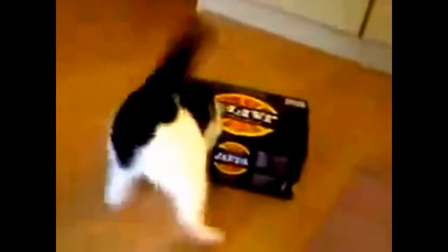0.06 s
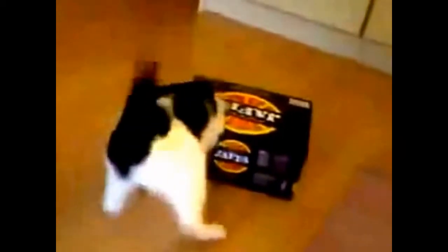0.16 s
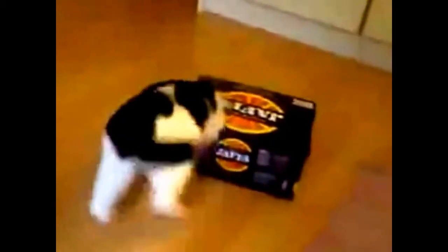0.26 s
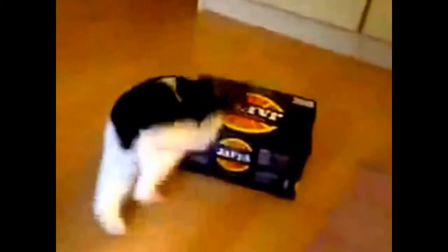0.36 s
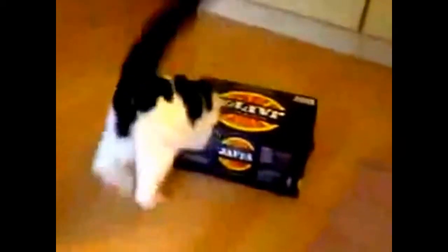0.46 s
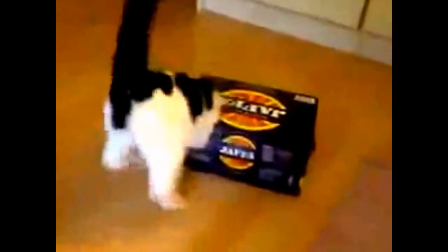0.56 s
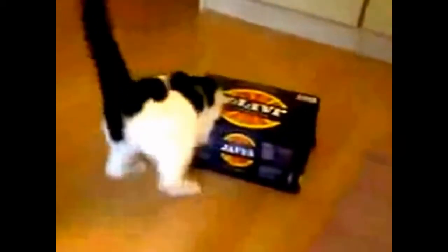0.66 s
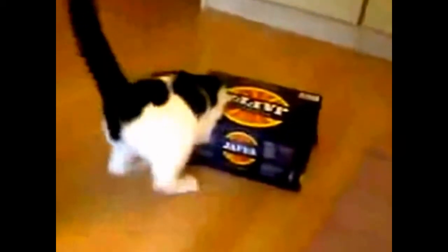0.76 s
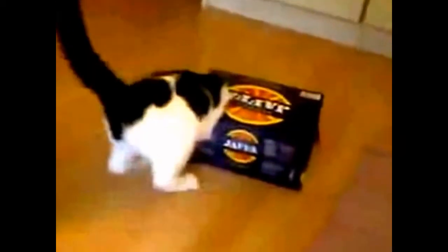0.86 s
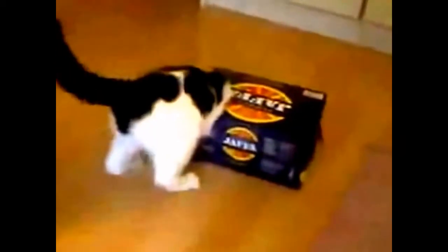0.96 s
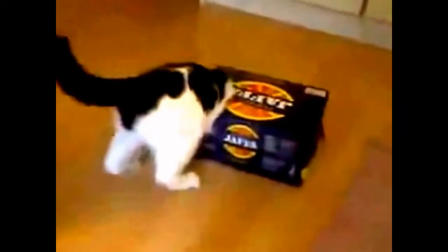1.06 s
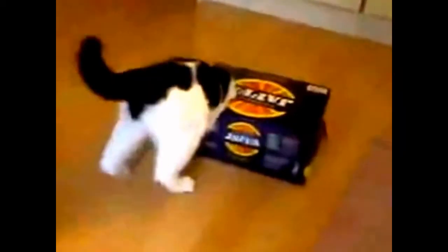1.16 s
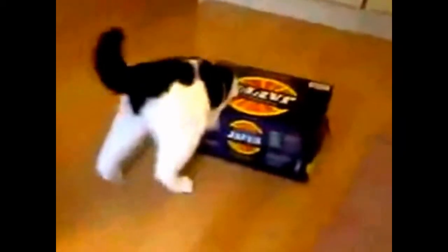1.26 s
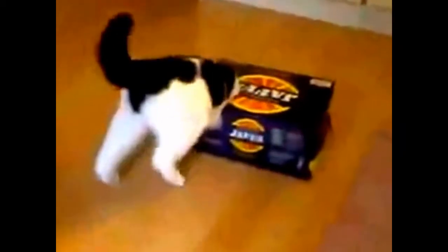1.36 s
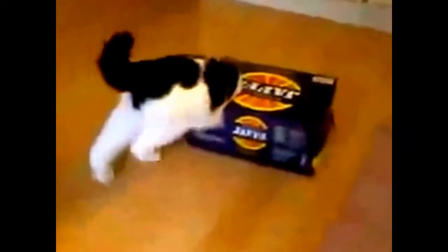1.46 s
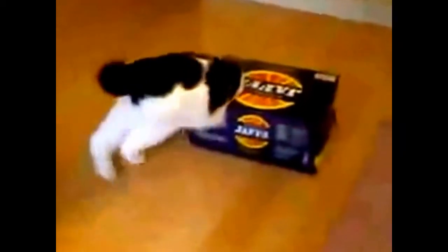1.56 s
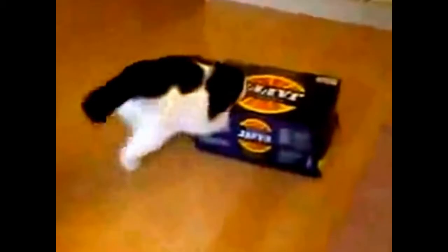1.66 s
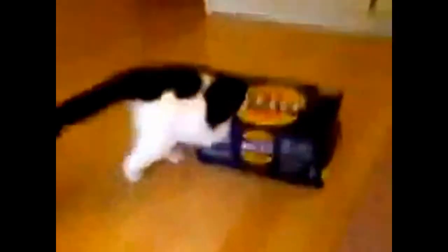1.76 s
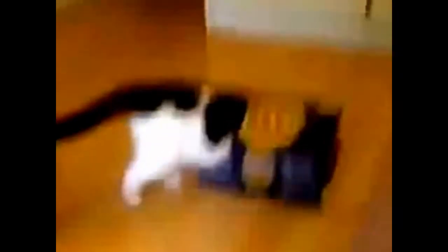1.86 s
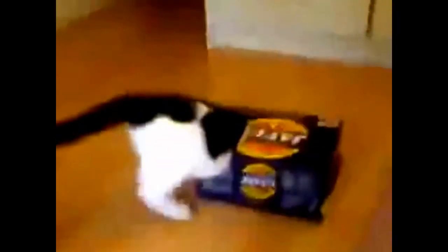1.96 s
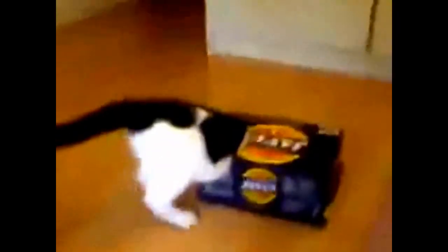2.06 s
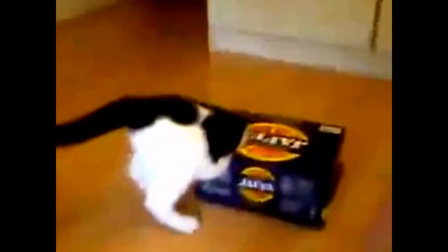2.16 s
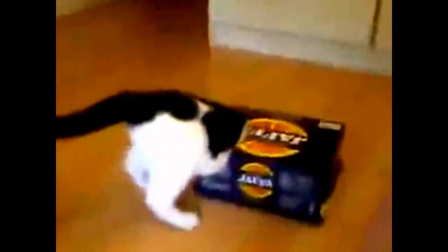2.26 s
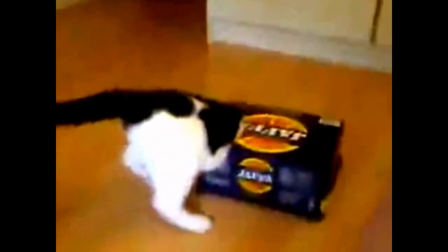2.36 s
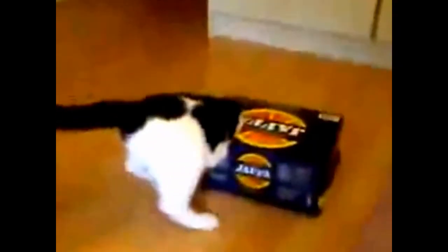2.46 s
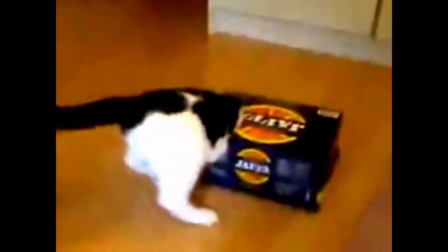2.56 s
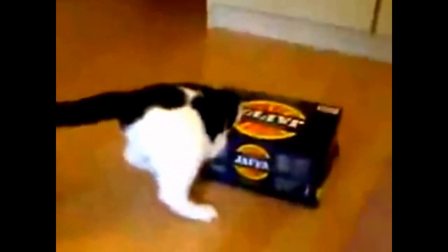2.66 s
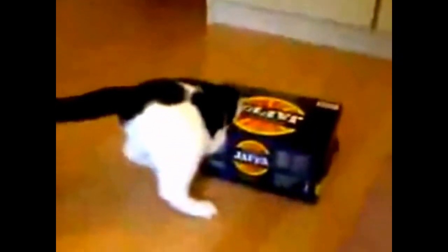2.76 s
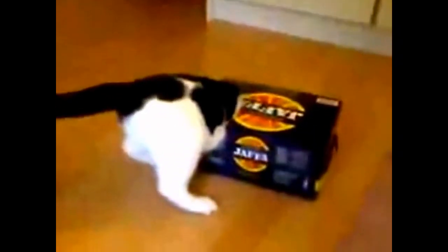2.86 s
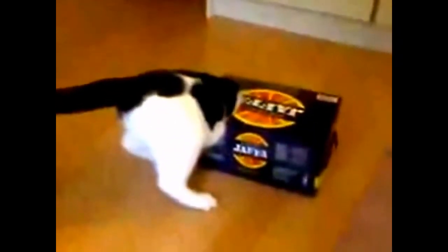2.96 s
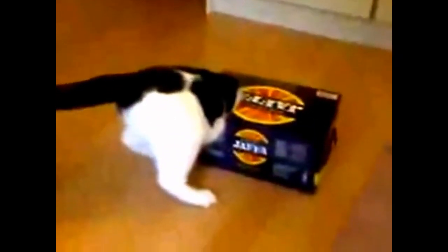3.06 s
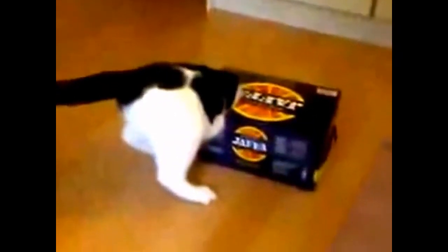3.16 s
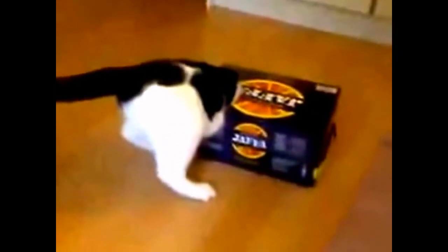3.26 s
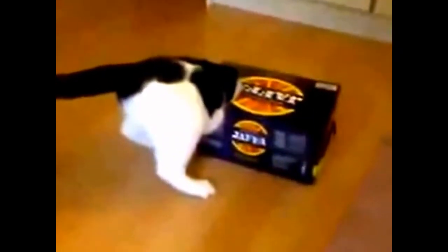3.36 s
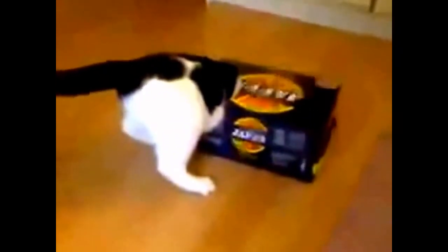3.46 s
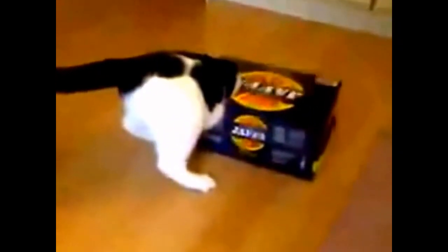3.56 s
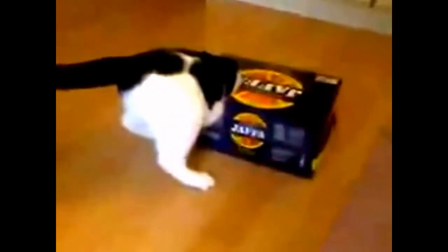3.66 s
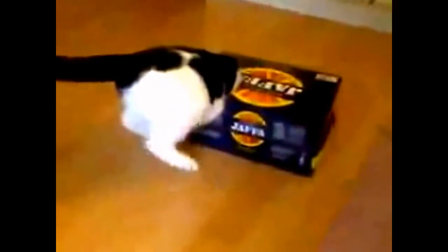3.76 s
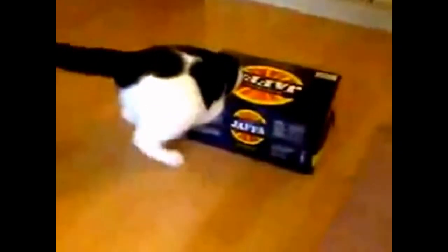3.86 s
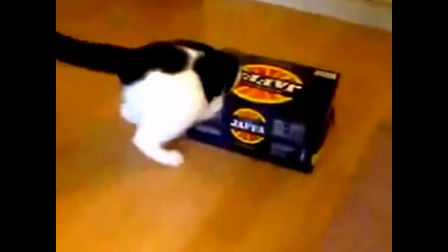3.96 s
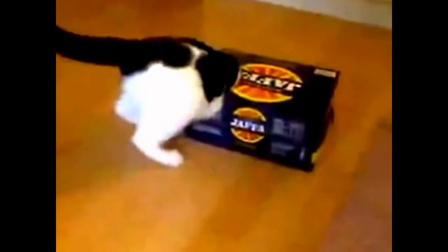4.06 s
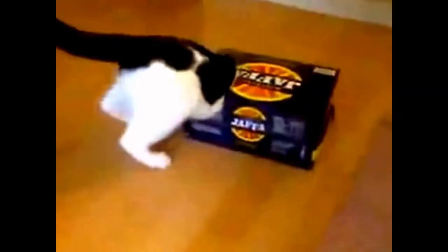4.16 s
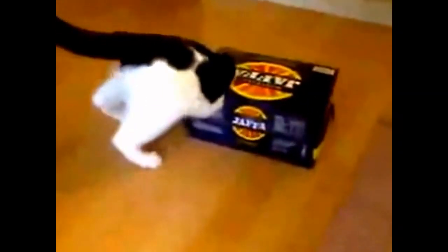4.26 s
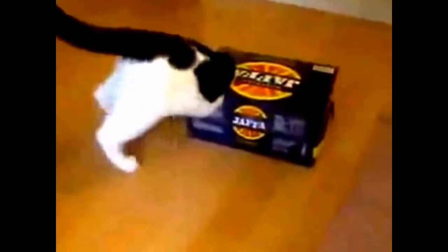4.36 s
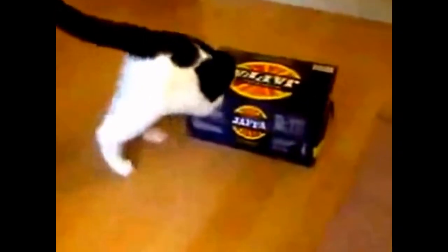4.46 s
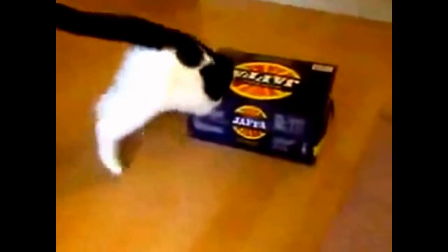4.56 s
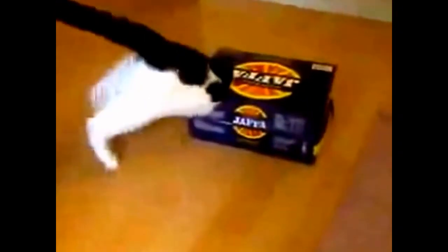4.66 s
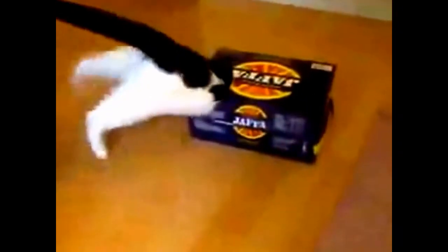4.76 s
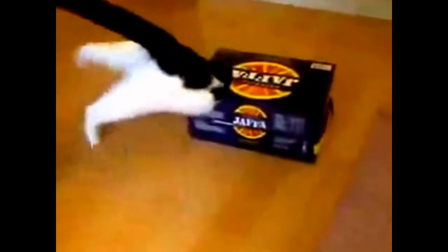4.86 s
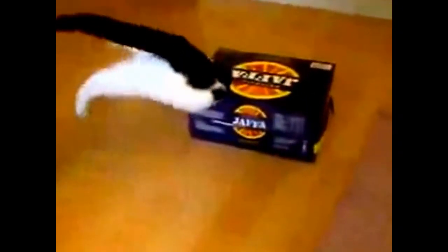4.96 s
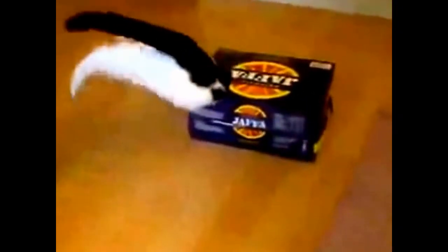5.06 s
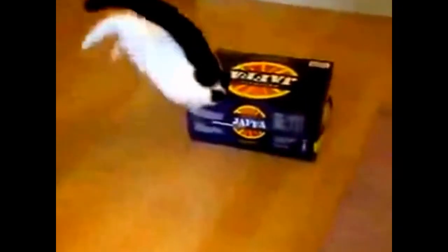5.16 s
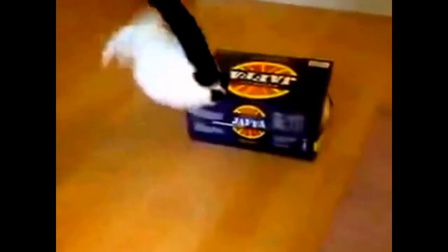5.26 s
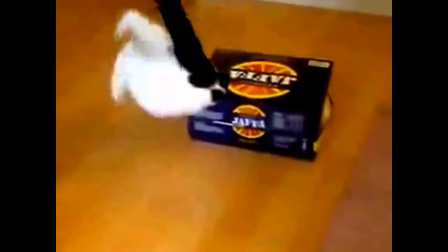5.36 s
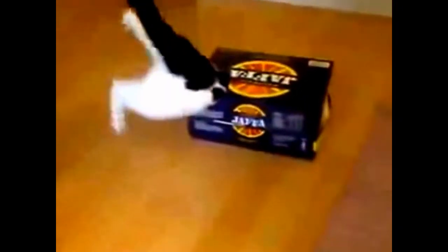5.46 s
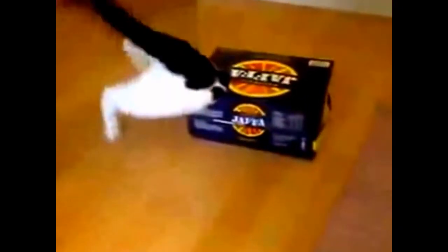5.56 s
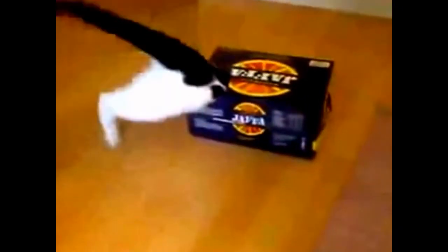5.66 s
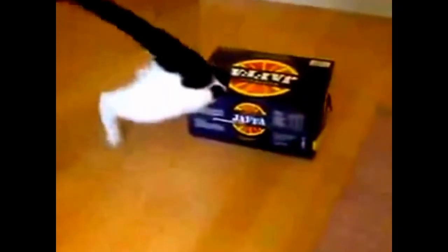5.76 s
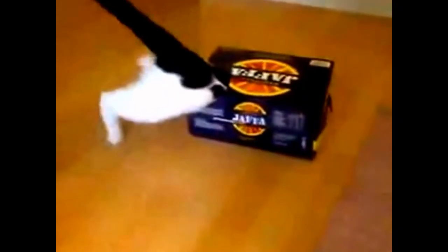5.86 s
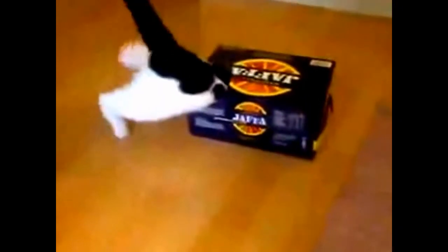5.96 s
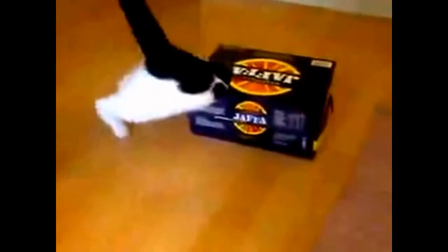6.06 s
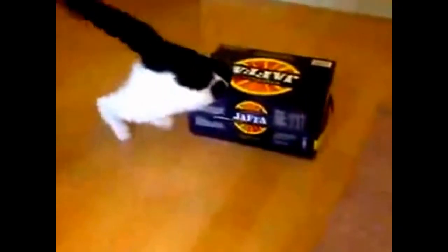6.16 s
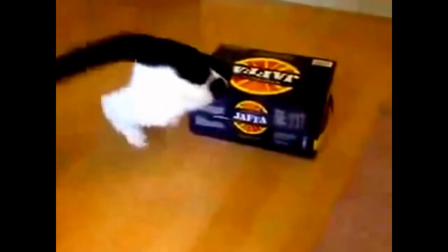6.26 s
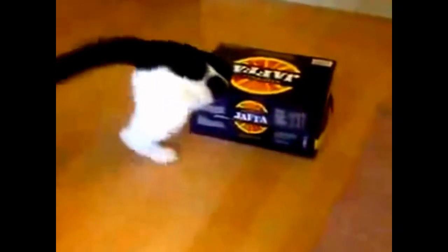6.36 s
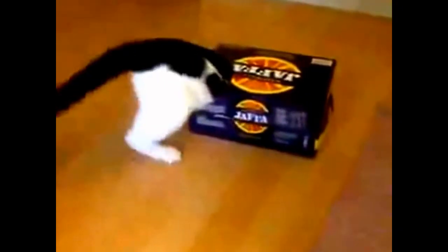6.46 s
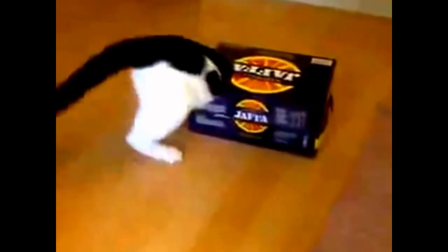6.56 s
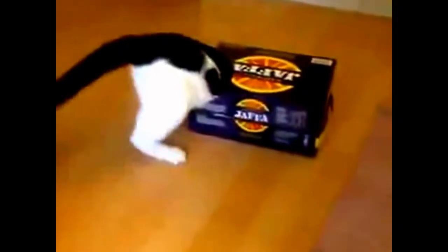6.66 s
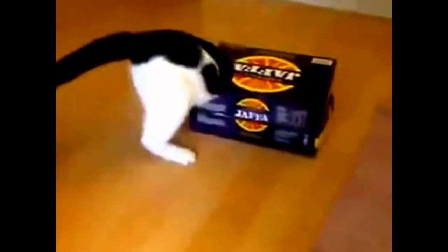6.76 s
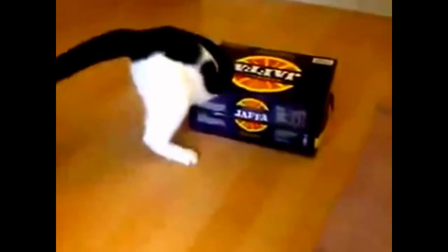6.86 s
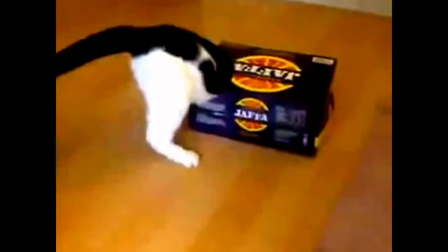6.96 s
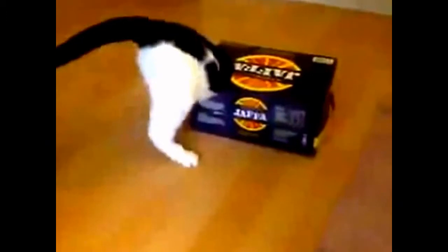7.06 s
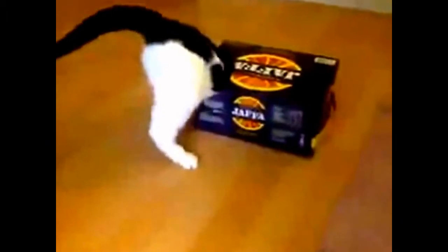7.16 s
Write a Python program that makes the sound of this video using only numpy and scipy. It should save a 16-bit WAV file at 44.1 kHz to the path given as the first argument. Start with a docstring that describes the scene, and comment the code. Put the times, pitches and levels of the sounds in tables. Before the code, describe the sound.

Scratchy claws and sharp cardboard cracks come in bursts as a cat shoves a box across floorboards, with dull thuds and hoarse paw squeaks.

```python
"""A cat crawls head first into a thin cardboard carton and shoves it over a wooden floor in a small room.
In the first second claws rasp and the card snaps, both made of tiny random slips and cracks rung by the carton.
A calmer second follows, then thuds (slow floor swings), a sharp snap and more rasping, then near stillness to 4 s.
The busiest part comes next: loud snaps near 4.7 s, long scrapes and skids, then hoarse squeaks near 6 s
and last knocks and drags from 6.6 s. Low rumble, faint hiss and mains hum run throughout."""
import sys
import numpy as np
from scipy import signal
from scipy.fft import rfft, irfft
from scipy.io import wavfile
from scipy.ndimage import uniform_filter1d

SR = 44100
rng = np.random.default_rng(int(sys.argv[2]) if len(sys.argv) > 2 else 0)


def waveform_to_disk(signal):
    """Save audio, clipped to [-1, 1], as 16-bit WAV at the path in sys.argv[1]."""
    frames = np.transpose(np.atleast_2d(signal))
    scaled = np.clip(frames, -1, 1) * 32767
    samples = np.round(scaled).astype(np.int16)
    wavfile.write(sys.argv[1], SR, samples)


N = 317520
# movements are shaped on a millisecond clock [s]
CLOCK = np.arange(0, N / SR, .001)


def undb(db):
    """Decibels to gain."""
    return 10 ** (np.asarray(db) / 20)


def unit(x):
    """Scale to rms 1."""
    return x / np.sqrt(np.mean(x ** 2))


def walk(rate):
    """Smooth random wander with a spread near 1, taking about rate new values a second."""
    k = max(int(SR / rate), 1)
    steps = np.repeat(rng.standard_normal(N // k + 1), k)
    return unit(uniform_filter1d(steps, k))[:N]


def colour(x, points):
    """Shape a sound by (frequency [Hz], level [dB]) points."""
    hz, db = np.transpose(points)
    f = np.maximum(np.fft.rfftfreq(N, 1 / SR), 1)
    gain = undb(np.interp(np.log(f), np.log(hz), db))
    return irfft(rfft(x) * gain, N)


def add(track, s, sound):
    """Mix a sound in at time s."""
    i = int(s * SR)
    track[i:i + len(sound)] += sound[:N - i]


def per_sample(control):
    """A control on the millisecond clock, at every sample."""
    return np.interp(np.arange(N) / SR, CLOCK, control)


# how fast a held movement tires
SAG_DB_PER_S = 10.5


def swell(start_s, attack_s, hold_s, release_s):
    """Gain of one movement: it builds up, holds with a slight sag and dies away by 60 dB in release_s."""
    t = CLOCK - start_s
    rise = np.clip(t / max(attack_s, 1e-3), 0, 1)
    held = np.clip(t - attack_s, 0, hold_s)
    released = np.maximum(t - attack_s - hold_s, 0)
    fade = np.exp(-np.log(1000) * released / max(release_s, .02))
    return rise * undb(-SAG_DB_PER_S * held) * fade


def movements(rows):
    """Gain of (start, attack, hold, release, dB) movements whose powers add up."""
    power = sum((undb(db) * swell(*shape)) ** 2 for *shape, db in rows)
    return per_sample(np.sqrt(power))


def ring(x, hz, width_hz):
    """One resonance, gain 1 at its centre."""
    top = SR * .45
    hz = min(hz, top)
    return signal.lfilter(*signal.iirpeak(hz, hz / min(width_hz, top), fs=SR), x)


# what the carton rings with: (frequency [Hz], width [Hz], level over the unrung push [dB])
CARTON_RINGS = [(462, 160, -5.5), (577, 32, -6.5), (670, 57, -8), (900, 15, -6), (1170, 15, -21),
                (1334, 64, -4), (1763, 37, -7.5), (3480, 130, -16), (4010, 110, -7.5), (5650, 51, -8.5),
                (5605, 72, -13), (7470, 130, -11), (8950, 86, -21.5)]


def carton(x):
    """The card passes every push on and adds its panel and cavity resonances."""
    return x + sum(undb(db) * ring(x, hz, width) for hz, width, db in CARTON_RINGS)


def burst(decay_s, rise_s):
    """A quick train of fibre cracks that dies away."""
    t = np.arange(SR // 8) / SR
    cracks = rng.choice([-1, 1], len(t))
    return cracks * np.exp(-t / max(decay_s, 1e-4)) * (1 - np.exp(-t / rise_s))


def blow(push, hz, width_hz):
    """A push on a patch of card tuned near hz, scaled to a peak of about 1."""
    y = carton(ring(ring(push, hz, width_hz), hz, width_hz))
    power = uniform_filter1d(y ** 2, size=64)
    return y / (2.1 * np.sqrt(power.max()))  # 2.1: crest of a crack over its loudest moment


def friction(rate, spread_db, judder_hz, judder_db):
    """Dense tiny slips of unequal size that bunch up as the contact grips and lets go."""
    slips = (rng.random(N) < rate / SR) * rng.choice([-1, 1], N)
    sizes = undb(spread_db * np.minimum(rng.exponential(size=N), 4))
    return slips * sizes * undb(judder_db * walk(judder_hz))


def scrape(slips, points, patchy_db, focus_hz=1, focus_db=0):
    """Slips through the carton, rms 1; bands swell unevenly as the contact wanders over the card."""
    spectrum, out = rfft(colour(carton(slips), points)), 0
    octaves = np.log2(np.maximum(np.fft.rfftfreq(N, 1 / SR), 1))
    centres = np.linspace(np.log2(200), np.log2(9000), 12)
    focus = np.log2(focus_hz)
    for centre, band in zip(centres, np.eye(len(centres))):
        # bands near the focus pitch are lifted
        lift_db = focus_db * np.exp(-((centre - focus) / 0.44) ** 2)
        band_sound = irfft(spectrum * np.interp(octaves, centres, band), N)
        out = out + band_sound * undb(patchy_db * walk(28) + lift_db)
    return unit(out)


# tone of the faint hiss in the still room: (frequency [Hz], level [dB])
AIR_COLOUR = [(100, -10), (240, -1.5), (330, 3), (450, -6), (950, -8), (1900, -12.5), (2500, -19),
              (10000, -18.5)]


def air():
    """Faint room hiss: shaped noise with a slightly wandering level."""
    return unit(colour(rng.standard_normal(N), AIR_COLOUR)) * undb(-72 + .7 * walk(6.53))


# mains hum: (frequency [Hz], middle rms level [dB])
HUM_TONES = [(48.5, -66), (97, -68)]


def hum():
    """Mains hum: steady low tones whose levels wander a little."""
    t = np.arange(N) / SR
    return sum(undb(db + 0.89 * walk(3.2)) * np.sqrt(2) * np.sin(2 * np.pi * hz * t) for hz, db in HUM_TONES)


# tone of the low rumble: (frequency [Hz], level [dB])
RUMBLE_COLOUR = [(20, -5.5), (45, -2), (62, -5), (80, -11), (110, -9.5), (160, -18.5), (260, -32),
                 (600, -58.5)]


def rumble():
    """Unsteady low noise; the boards rumble on after each thud."""
    # the boards start 30.5 dB under the thud and take 0.8 s to fall by 60 dB
    shake = movements([(s, .02, 0, .8, db - 30.5) for s, db, _, _ in THUDS])
    strength = np.hypot(undb(-62.5), shake)
    noise = unit(colour(rng.standard_normal(N), RUMBLE_COLOUR))
    return noise * strength * undb(2.25 + 2 * walk(11))


def background():
    """Low rumble, faint hiss and mains hum together."""
    return rumble() + air() + hum()


# how quickly the room falls silent: (frequency [Hz], time to fall by 60 dB [s])
ROOM_DECAY = [(200, 0.43), (800, 0.3), (2100, 0.4), (5500, 0.2), (10000, 0.28)]
ROOM_DRIFT_HZ = 1.504  # how fast the reflections change as cat and carton move


def room(x, wet_db, gap_s):
    """Hard floor and cupboards return a short, dense, changing tail, each pitch range fading at its own pace."""
    t = np.arange(SR // 2) / SR
    f = np.fft.rfftfreq(len(t), 1 / SR)
    hz, t60 = np.transpose(ROOM_DECAY)
    # three random tails share the sound in ever-changing amounts
    shares, wet = np.array([walk(ROOM_DRIFT_HZ) for _ in range(3)]), 0
    for share in shares / np.linalg.norm(shares, axis=0):
        noise = rfft(rng.standard_normal(len(t)))
        tail = 0
        for band, life in zip(np.eye(len(hz)), t60):
            tail = tail + irfft(noise * np.interp(f, hz, band)) * np.exp(-np.log(1000) * t / life)
        tail = tail * (t > gap_s)
        wet = wet + signal.fftconvolve(x * share, tail / np.linalg.norm(tail))[:N]
    return x + undb(wet_db) * wet


# soft heavy thuds through the floor: (time [s], level [dB], pitch [Hz], decay [s])
THUDS = [(1.873, -18, 46, 0.017), (1.987, -32.5, 59.6, 0.007), (2.035, -33, 59.6, 0.009),
         (2.118, -22.5, 49, 0.012), (2.139, -33.5, 29.5, 0.05), (2.332, -37, 40, 0.025),
         (2.43, -41, 25.5, 0.059), (3.114, -51, 45.3, 0.026), (5.2, -42.5, 61, 0.027),
         (5.675, -37, 70, 0.015)]


def thuds():
    """A few slow swings of the floor, with a dull patter at the contact."""
    out, t = np.zeros(N), np.arange(SR // 4) / SR
    for s, db, hz, decay_s in THUDS:
        # two modes of the boards
        swing = np.sin(2 * np.pi * hz * t) + undb(-5.5) * np.sin(2 * np.pi * 1.8 * hz * t)
        add(out, s, undb(db) * swing * np.exp(-t / decay_s) * (1 - np.exp(-t / 0.0052)))
        patter = blow(burst(.016, rise_s=.001), hz=143, width_hz=180)
        add(out, s, undb(db - 9.0) * patter)
    return out


# paws and head bumping the carton:
# (time [s], peak level before the layer's trim [dB], centre [Hz], rattle decay [s])
KNOCKS = [(0.168, -31, 560, 0.042), (0.492, -29.5, 603, 0.0096), (0.513, -31, 530, 0.0072),
          (0.767, -33, 1350, .005), (0.913, -31, 600, .008), (1.258, -31, 2800, 0.0041),
          (1.416, -32.5, 586, 0.0078), (1.713, -21, 1670, 0.007), (2.072, -22, 660, 0.012),
          (2.15, -24.5, 1200, 0.0021), (2.428, -33.5, 1363, 0.0048), (2.695, -26, 600, .012),
          (4.239, -18, 1186, 0.015), (4.741, -15, 720, 0.0032), (5.025, -19, 850, 0.0039),
          (5.604, -38.5, 1580, 0.0072), (5.651, -29, 980, 0.0087), (5.734, -17, 1295, 0.0065),
          (6.194, -32, 2700, 0.0033), (6.378, -34, 1200, .004), (6.59, -23, 690, 0.0085),
          (6.643, -15, 1080, 0.008), (6.658, -20, 704, 0.0039), (6.995, -31, 1280, 0.0054)]


def knocks():
    """Padded blows make the carton rattle briefly on the floor."""
    out = np.zeros(N)
    for s, db, hz, rattle_s in KNOCKS:
        add(out, s, undb(db) * blow(burst(rattle_s, rise_s=0.00033), hz, width_hz=0.65 * hz))
    return out * undb(-4.0)


# a claw tip flicking off a card edge: (time [s], peak level [dB], centre [Hz])
TICKS = [(0.271, -23.5, 5500), (0.2967, -23, 3470), (4.7571, -14, 8000), (4.7647, -10.5, 7800),
         (6.399, -23.5, 8000)]


def ticks():
    """Single hard flicks, over in about a millisecond."""
    out = np.zeros(N)
    for s, db, hz in TICKS:
        add(out, s, undb(db) * blow(burst(0.00012, rise_s=.00005), hz, width_hz=4000))
    return out


# a paw pad squeaking hoarsely as it slips:
# (start [s], attack [s], hold [s], 60 dB release [s], level [dB], pitch before its wobble [Hz])
SQUEAKS = [(5.641, .02, 0.0081, 0.11, -47.5, 985), (5.89, 0.038, 0.033, 0.28, -34.5, 1065),
           (6.018, 0.033, 0.024, 0.13, -34.5, 1053), (6.264, 0.041, 0.068, .15, -47.5, 1089)]


def squeak():
    """A pad sticks and slips about a thousand times a second, never quite evenly."""
    s, *_, pitch = np.transpose(SQUEAKS)
    wobble = 1 + 0.027 * walk(35) + 0.081 * walk(900)
    hz = np.interp(np.arange(N) / SR, s, pitch) * wobble
    phase = 2 * np.pi * np.cumsum(hz) / SR
    tone = np.sin(phase) + undb(-18.0) * np.sin(2 * phase) + undb(-8) * np.sin(3 * phase)
    return unit(tone * undb(4.3 * walk(140))) * movements([row[:-1] for row in SQUEAKS])


# a stiff flap singing as it is dragged past:
# (start [s], attack [s], hold [s], 60 dB release [s], level before the trim [dB])
FLAP_DRAGS = [(0.86, 0.038, 0.063, 0.28, -35.5), (2.675, 0.026, 0.037, 0.32, -37.5),
              (4.738, 0.011, .12, .45, -30.5), (5.733, 0.0037, 0.0071, 0.43, -27.5)]
# tone of the flap: (frequency [Hz], level [dB])
FLAP_COLOUR = [(2000, -36.5), (3200, -13.5), (3800, 3.5), (4200, -3.5), (4700, -18), (5400, -7),
               (6500, -21), (10000, -42)]


def flap():
    """Friction sets a stiff flap singing."""
    slips = friction(rate=700, spread_db=2.0, judder_hz=125.6, judder_db=1.5)
    return unit(colour(carton(slips), FLAP_COLOUR)) * movements(FLAP_DRAGS) * undb(-1.5)


# the walls flexing as the cat leans in:
# (start [s], attack [s], hold [s], 60 dB release [s], level before the trim [dB])
FLEXES = [(5.015, 0.009, .006, .12, -38.5), (6.58, 0.018, 0.087, 0.36, -53), (6.92, 0.035, .15, 0.21, -40)]
# tone of the walls: (frequency [Hz], level [dB])
FLEX_COLOUR = [(100, -12), (215, -6.5), (290, 5), (370, 1), (450, 1.5), (545, 4), (720, -11), (1500, -23.5)]


def walls():
    """Friction sets the broad walls groaning."""
    slips = friction(rate=1800, spread_db=1.0, judder_hz=49.2, judder_db=0.0)
    return unit(colour(carton(slips), FLEX_COLOUR)) * movements(FLEXES) * undb(-2.7)


# card snapping and claws catching:
# (time [s], crack peak before the layer's trim [dB], centre [Hz], crumple decay [s],
#  wall knock against the crack [dB], rustle afterwards against the listed peak [dB])
SNAPS = [(0.0608, -12, 3330, 0.0031, -16, -19), (0.2232, -21.5, 3690, 0.0066, -15, -25.5),
         (0.272, -15, 3715, 0.004, -17.5, -30.5), (0.378, -17.5, 6200, 0.007, -14.5, -22),
         (0.4915, -29, 3670, 0.0058, -16, -28), (0.644, -15.5, 4200, 0.0045, -14, -17.5),
         (0.9098, -15, 5400, 0.007, -13.5, -21.5), (1.0064, -21.5, 4530, 0.0075, -13, -18.5),
         (1.2572, -41, 1996, 0.0027, -16, -7.5), (1.715, -31, 2530, 0.004, -3, -24.5),
         (2.072, -11, 5630, 0.00305, -10, -21.5), (2.1487, -30, 3390, 0.0036, 4, -29),
         (2.3337, -22, 6500, 0.0054, -4.5, -26.5), (2.6924, -13.5, 4220, 0.0057, -17, -21),
         (4.0487, -43, 3430, 0.0052, -14, -24), (4.0917, -23.5, 5600, 0.0065, -11, -15),
         (4.6354, -17.5, 5970, 0.0033, -13.5, -19.5), (4.7412, -6.5, 3800, 0.0038, -16, -26),
         (4.7641, -8, 6210, 0.0035, -23, -29), (4.9921, -16, 3890, 0.0051, -37.5, -25),
         (5.202, -29, 4885, 0.007, -12, -15), (5.7384, -10.5, 3700, 0.0032, -20, -23),
         (6.3996, -27, 3880, 0.012, -5.5, -14), (6.6402, -21.5, 6020, 0.0043, 0, -24.5)]


def snaps():
    """The card buckles with a bright crack, and the wall behind it knocks."""
    out = np.zeros(N)
    for s, db, hz, crumple_s, wall_db, _ in SNAPS:
        crack = blow(burst(crumple_s, rise_s=0.0007), hz, width_hz=4030)
        wall = blow(burst(0.0047, rise_s=0.00067), hz=900, width_hz=5400)
        add(out, s, undb(db) * (crack + undb(wall_db) * wall))
    return out * undb(-2.5)


# hind paws skidding on the varnish:
# (start [s], attack [s], hold [s], 60 dB release [s], level before the trim [dB])
SKIDS = [(0.25, .025, 0.013, 0.19, -37), (0.65, .03, .025, 0.27, -41.5), (1.258, 0.013, 0.026, 0.36, -49),
         (1.72, 0.078, 0.17, 0.21, -41), (2.52, 0.076, .11, 0.32, -35.5), (2.88, .03, 0.084, 0.37, -66),
         (3.25, .02, 0.015, 0.53, -65.5), (4.226, 0.011, 0.013, .3, -32.5), (4.27, 0.074, 0.25, 1, -35.5),
         (4.84, .06, 0.23, 0.58, -34), (5.28, 0.092, .04, 0.54, -45.5), (5.645, 0.0081, 0.024, .3, -44),
         (5.73, 0.0068, .02, 0.84, -34.5), (5.83, 0.085, 0.18, 0.36, -34), (6.14, 0.025, 0.18, 0.94, -47),
         (6.72, .04, .12, 0.76, -42.5), (6.94, 0.041, 0.075, 0.34, -36)]
# tone of the skids: (frequency [Hz], level [dB])
SKID_COLOUR = [(500, -27), (830, -15.5), (960, -0.5), (1150, -0.5), (1350, -3.5), (1700, -5), (2200, -10),
               (3000, -14), (4500, -27), (9000, -35.5)]


def skids():
    """Padded paws slip on the floor and give middle pitches."""
    slips = friction(rate=2000, spread_db=1.5, judder_hz=46.04, judder_db=4.65)
    return scrape(slips, SKID_COLOUR, patchy_db=1.8) * undb(-3.0) * movements(SKIDS)


# strokes of the forelegs; each rasps on the card and drags the carton over the boards:
# (start [s], attack [s], hold [s], 60 dB release [s], then levels before each layer's trim:
#  rasp [dB], fine hiss [dB], slide [dB], and the brightest pitch [Hz])
STROKES = [ (0.0, .004, .012, 0.23, -50.5, -67, -49, 3085),
           (0.154, 0.018, .06, 0.22, -42, -52, -43.5, 3500),
           (0.185, 0.039, .035, 0.23, -31.5, -39.5, -54, 4400),
           (0.248, .022, .018, 0.35, -26, -50, -49, 3800), (0.359, 0.02, .008, 0.25, -32.5, -45, -55, 3980),
           (0.477, .03, 0.017, 0.22, -33.5, -50, -35, 2880),
           (0.541, 0.04, .08, 0.31, -38, -46, -45.5, 3950), (0.794, .04, .04, .22, -42, -58, -43.5, 3510),
           (0.832, 0.028, .08, 0.35, -35, -48, -57, 4410), (1.125, .04, .24, .2, -72, -79, -60.5, 2583),
           (1.393, 0.027, 0.24, 0.22, -52.5, -68, -48, 2900),
           (1.608, 0.03, 0.0033, .17, -39, -51.5, -56, 3890),
           (1.703, .028, .09, 0.36, -34.5, -43, -40, 3570), (1.843, 0.036, .08, .18, -37, -54, -42, 2880),
           (2.377, .055, .06, .25, -60.5, -60, -51, 3290), (2.46, 0.07, 0.19, 0.25, -35, -44, -42.5, 3814),
           (3.245, 0.0066, .03, 0.44, -74.5, -90, -71.5, 2600),
           (4.011, .06, .07, 0.38, -65.5, -64, -58.5, 3440), (4.191, 0.033, .01, .2, -45, -57, -59, 2976),
           (4.223, .025, .05, .55, -38, -49, -39.5, 2600),
           (4.293, .06, .02, 0.35, -32.5, -41.5, -39.5, 3400),
           (4.398, 0.049, 0.21, .22, -35.5, -46, -42.5, 2975),
           (4.745, .015, 0.082, .4, -31.5, -41.5, -39, 4100),
           (4.814, 0.027, 0.05, 0.72, -27.5, -40.5, -37, 3847),
           (4.99, .045, 0.035, .6, -41, -54, -46.5, 3300),
           (5.184, 0.015, .19, 0.36, -45.5, -58.5, -51.5, 3180),
           (5.589, .055, .045, 0.22, -57, -60, -54, 2777),
           (5.833, 0.087, .012, 0.49, -29.5, -41.5, -47, 3440),
           (6.207, .08, .08, .4, -53, -66.5, -60, 3380), (6.44, .04, .1, 0.17, -60, -63.5, -52, 3000),
           (6.569, 0.029, .035, 0.28, -48, -50.5, -41.5, 3800),
           (6.636, .015, 0.038, 0.31, -41.5, -59, -31.5, 3000),
           (6.767, .03, 0.24, .4, -60.5, -73, -51, 2600),
           (6.93, 0.092, 0.074, 0.24, -40.5, -60, -44.5, 4510), ]
# the card rustles on as it springs back; a higher snap leaves more hiss, and the carton shifts a little
RUSTLE_ATTACK_S, RUSTLE_HOLD_S, RUSTLE_T60_S = 0.007, .012, 0.31
RUSTLE_HISS_DB, RUSTLE_HISS_DB_PER_OCTAVE, RUSTLE_MIDDLE_HZ = -13.5, 4, 4000
RUSTLE_SLIDE_DB = -12.5


def contacts():
    """Strokes and the rustle after each snap, as (gain over time, rasp dB, hiss dB, slide dB, brightest Hz)."""
    for *shape, rasp_db, hiss_db, slide_db, hz in STROKES:
        yield swell(*shape), rasp_db, hiss_db, slide_db, hz
    for s, peak_db, hz, _, _, rustle_db in SNAPS:
        db = peak_db + rustle_db
        hiss_db = RUSTLE_HISS_DB + RUSTLE_HISS_DB_PER_OCTAVE * np.log2(hz / RUSTLE_MIDDLE_HZ)
        gain = swell(s, RUSTLE_ATTACK_S, RUSTLE_HOLD_S, RUSTLE_T60_S)
        yield gain, db, db + hiss_db, db + RUSTLE_SLIDE_DB, hz


def effort():
    """Gains of rasp, hiss and slide, and a brightest pitch that leans toward the strongest contact."""
    gain, rasp_db, hiss_db, slide_db, hz = (np.array(column) for column in zip(*contacts()))
    power = gain ** 2 + 1e-18  # never quite zero, so the pitch stays defined
    rasp, hiss, slide = (undb(db) ** 2 @ power for db in (rasp_db, hiss_db, slide_db))
    pitch = (hz * undb(rasp_db) ** 2) @ power / rasp
    return [per_sample(control) for control in (np.sqrt(rasp), np.sqrt(hiss), np.sqrt(slide), pitch)]


# tone of the carton's base on the boards: (frequency [Hz], level [dB])
SLIDE_COLOUR = [(60, -19), (150, -10.5), (220, -12.5), (330, -10), (450, -4), (680, -1), (900, 0),
                (1350, -5.5), (2000, -1), (3000, -11.5), (5000, -15.5), (10000, -28.5)]


def sliding_base():
    """The flat base slips fairly evenly over the boards and gives middle pitches."""
    slips = friction(rate=4000, spread_db=1.5, judder_hz=71.6, judder_db=2.13)
    return scrape(slips, SLIDE_COLOUR, patchy_db=1.66) * undb(0.14)


# tone of the fine hiss: (frequency [Hz], level [dB])
HISS_COLOUR = [(3000, -31.5), (5500, -4.5), (7000, 3.5), (8500, 0), (10300, -7)]


def fine_hiss():
    """Many fine slips on the card give the top treble."""
    slips = friction(rate=4100, spread_db=-1.5, judder_hz=153.6, judder_db=2.3)
    return scrape(slips, HISS_COLOUR, patchy_db=3) * undb(0.5)


# tone of the claws on card: (frequency [Hz], level [dB])
CLAW_COLOUR = [(300, -33.5), (900, -26), (1400, -5.5), (2300, -3), (3100, 0.5), (3900, -1.5), (5200, -2.5),
               (6500, -7), (8000, -38), (10300, -34)]


def claw_rasp(focus_hz):
    """Hard claws catch coarsely on the fibres, loudest around a moving pitch."""
    slips = friction(rate=2600, spread_db=-0.5, judder_hz=161.2, judder_db=1.5)
    return scrape(slips, CLAW_COLOUR, patchy_db=2.0, focus_hz=focus_hz, focus_db=7.0) * undb(-2.5)


def rubbing():
    """Sliding contacts: claws give treble, the base and the padded paws give mids."""
    rasp_gain, hiss_gain, slide_gain, focus_hz = effort()
    card = claw_rasp(focus_hz) * rasp_gain + fine_hiss() * hiss_gain
    return card + sliding_base() * slide_gain + skids()


def scene():
    """Everything in the room, the same in both channels."""
    near = knocks() + ticks() + squeak() + flap() + walls() + snaps() + rubbing()
    mono = background() + thuds() + room(near, wet_db=-8.5, gap_s=0.0055)
    return np.array([mono, mono])


def record(dry):
    """A small camera close by cuts the treble steeply above 10450 Hz."""
    return signal.sosfilt(signal.ellip(10, .2, 70, 10450, fs=SR, output="sos"), dry)


dry = scene()
out = record(dry)
waveform_to_disk(out)
```